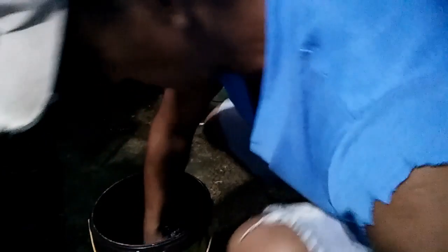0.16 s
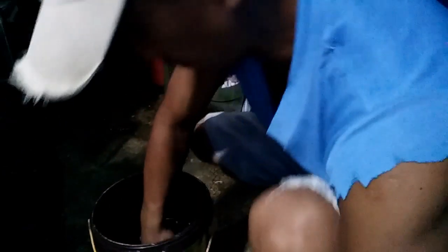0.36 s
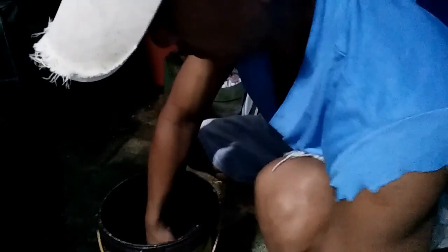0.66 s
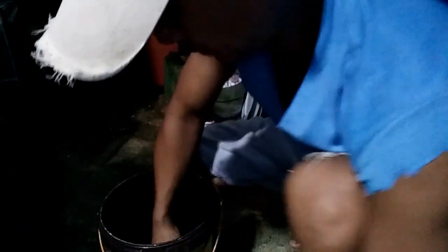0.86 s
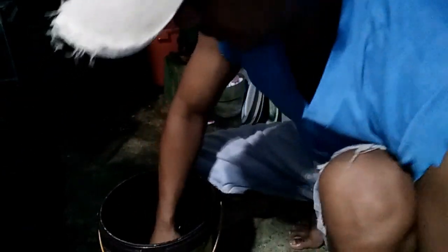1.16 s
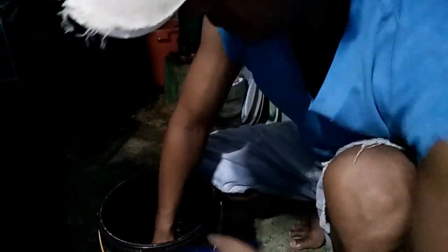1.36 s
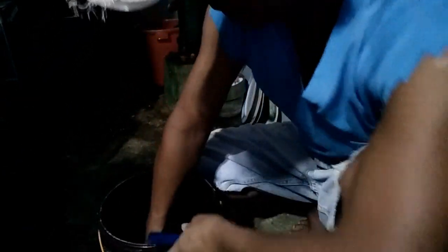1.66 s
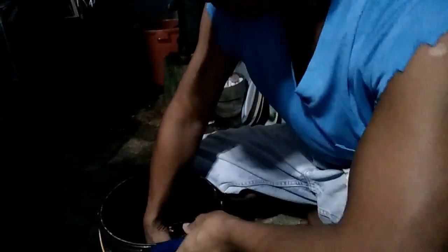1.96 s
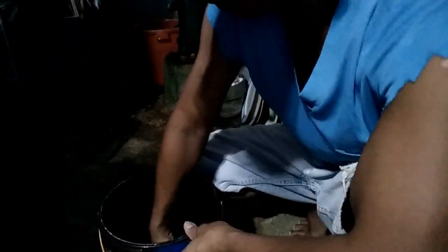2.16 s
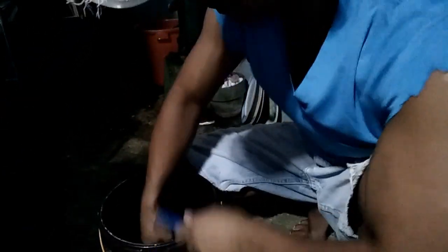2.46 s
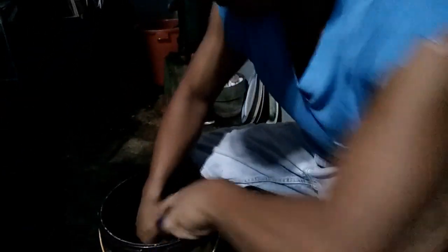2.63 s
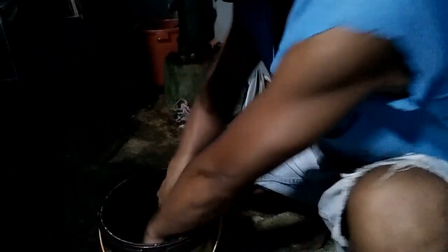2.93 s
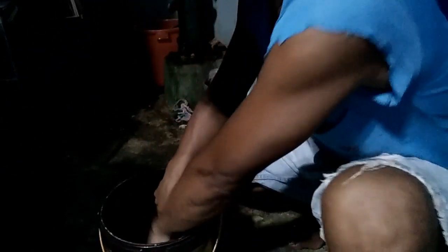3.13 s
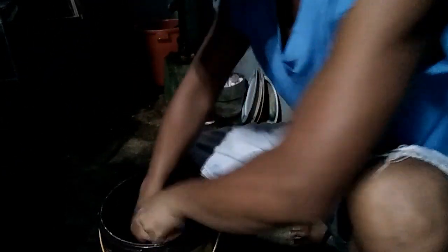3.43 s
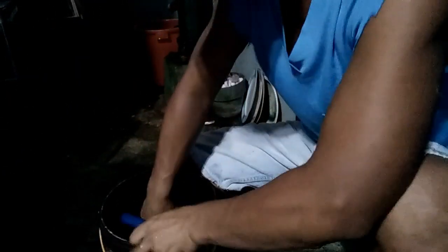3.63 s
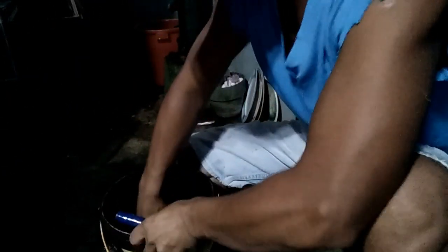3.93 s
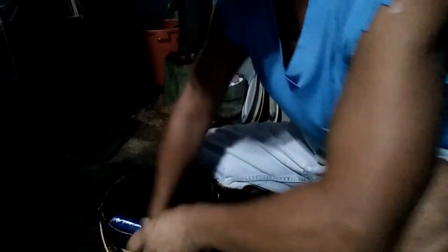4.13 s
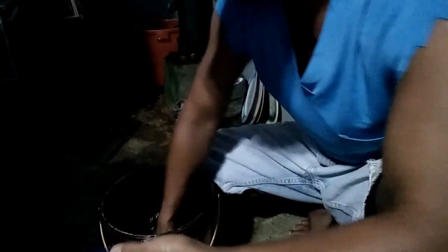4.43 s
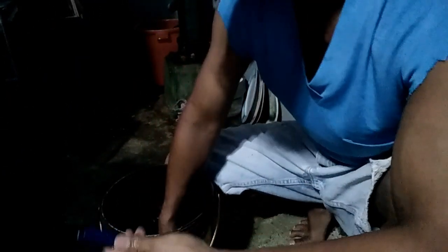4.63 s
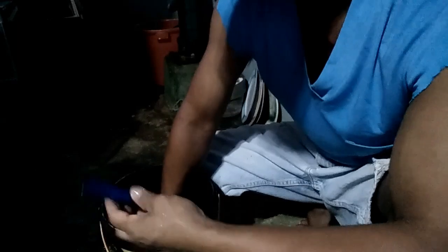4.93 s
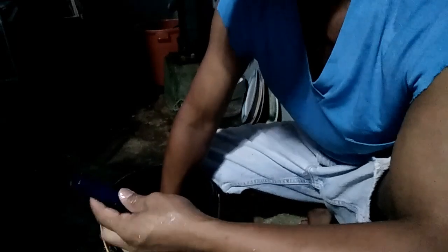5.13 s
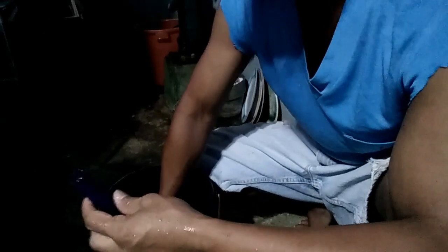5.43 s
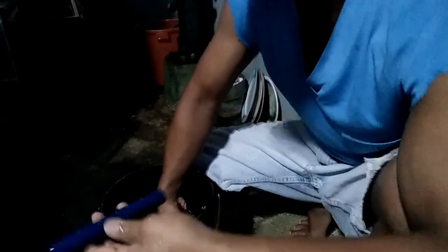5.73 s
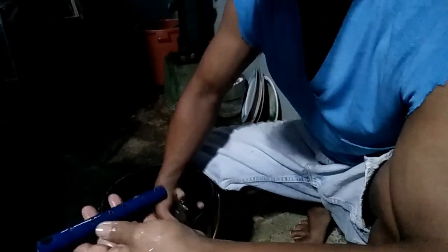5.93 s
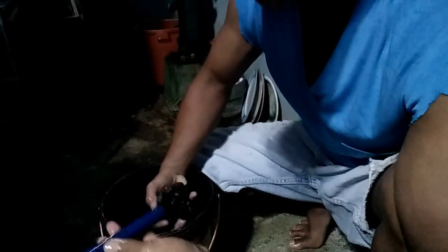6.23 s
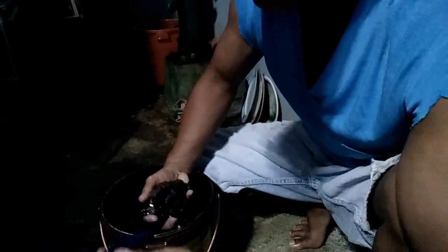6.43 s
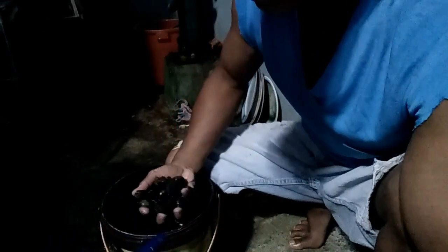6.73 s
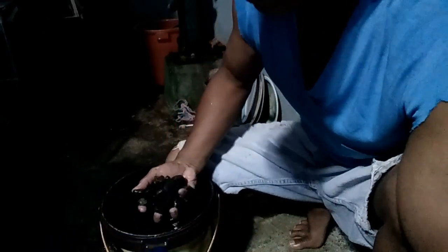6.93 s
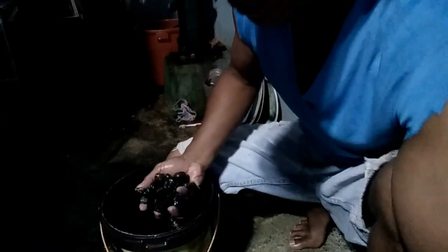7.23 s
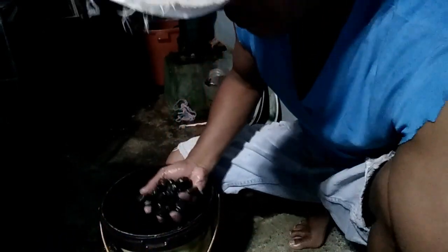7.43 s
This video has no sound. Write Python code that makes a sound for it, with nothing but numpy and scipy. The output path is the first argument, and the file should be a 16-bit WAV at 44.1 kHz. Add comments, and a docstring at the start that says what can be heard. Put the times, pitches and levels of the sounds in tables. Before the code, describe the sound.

Wet rattling strokes stir hard pieces in a water-filled bucket, with drips and bubbles, a handful slapping back, and one hard knock with a thin ring.

```python
"""Stirring hard pieces in a bucket of water

A hand stirs small hard pieces round in a plastic bucket of water, in a walled yard at night.
Each stroke sets random contacts churning on the bucket's resonances, among gurgling bubbles and splashes.
Pieces click as short noise bursts; drops, drips and an air pocket ring as bubbles of rising pitch.
Near the end a handful falls back with a slap, a knock on the rim and a thin ring follow, and a drop falls.
Diffuse echo surrounds it all, over filtered-noise night air."""
import sys
import numpy as np
from scipy import signal
from scipy.fft import rfft, irfft
from scipy.io import wavfile
from scipy.ndimage import uniform_filter1d

SR = 44100
rng = np.random.default_rng(int(sys.argv[2]) if len(sys.argv) > 2 else 0)


def unload_audio(sound):
    """Save the sound as a 16-bit wav file, at the path given as the first command line argument."""
    columns = np.transpose(np.atleast_2d(sound))
    # keep every value between -1 and 1, then stretch to whole-number steps
    steps = np.round(np.clip(columns, -1, 1) * 32767)
    wavfile.write(sys.argv[1], SR, steps.astype(np.int16))


N = 334719
TIME = np.arange(N) / SR

# Water running off the lifted hand. Each row: start in seconds, length in seconds, splash level in dB
# (before the splash's own trim).
RUNOFF = [(1.253, 0.17, -40), (2.696, 0.19, -44), (3.366, .17, -54.5), (3.601, 0.14, -55),
          (6.036, 0.18, -46.5), (6.274, 0.17, -37.5), (6.487, 0.051, -55), (6.776, 0.2, -50)]
# Spectrum of a bright tick. Each row: frequency in Hz, relative level in dB per Hz.
TICK_SPECTRUM = [(2000, -15), (4000, -6.5), (6000, -2.5), (7300, 3), (9500, 11), (11500, 0.5),
                 (14500, -7.5)]
# Spectrum of a dull clack. Each row: frequency in Hz, relative level in dB per Hz.
CLACK_SPECTRUM = [(200, -20.5), (450, -15), (600, -17), (1000, 2.5), (1600, -0.5), (2200, -1.5), (3200, -5),
                  (5000, -19), (8000, -32.5)]


def from_db(db):
    """Amplitude ratio of a level: twenty decibels per factor of ten."""
    return 10 ** (np.asarray(db) / 20)


def to_db(power):
    """Level of a power: ten decibels per factor of ten."""
    return 10 * np.log10(power + 1e-12)


def rms_one(x):
    """Normalise by the root of the mean power."""
    return x / np.sqrt(np.mean(x ** 2) + 1e-20)


def peak_one(x):
    """Normalise by the greatest excursion."""
    return x / np.max(np.abs(x))


def steady(x, size=4000):
    """Divide by the running rms over about a tenth of a second, leaving the quick grain."""
    return x / np.sqrt(np.abs(uniform_filter1d(x * x, size)) + 1e-12)


def fade(t, t60):
    """Exponential decay: the amplitude falls by 60 dB in t60 seconds."""
    return np.exp(-np.log(1000) * t / t60)


def add(out, s, sound):
    """Superposition: mix a sound in, starting at s seconds."""
    i = max(round(s * SR), 0)
    out[i:i + len(sound)] += sound[:N - i]


def at_hz(points, hz):
    """Interpolate a spectrum in dB along a logarithmic frequency axis."""
    freqs, levels = np.transpose(points)
    return np.interp(np.log(hz + 1), np.log(freqs), levels)


def colour(x, spectrum):
    """Minimum-phase filtering with unit-energy response: folding the cepstrum makes it causal."""
    size = 2048
    hz = np.arange(size // 2 + 1) * SR / size + 1
    gain = from_db(at_hz(spectrum, hz))
    # both ends of the spectrum fall away
    gain = gain / (1 + (spectrum[0][0] / hz / 2) ** 2) / (1 + (hz / spectrum[-1][0] / 2) ** 2)
    cepstrum = irfft(np.log(gain + 1e-6))
    cepstrum[1:size // 2] *= 2
    cepstrum[size // 2 + 1:] = 0
    response = irfft(np.exp(rfft(cepstrum)))
    return signal.oaconvolve(x, response / np.linalg.norm(response))[:len(x)]


def resonate(x, modes):
    """Modal synthesis: parallel two-pole resonances (Hz, width in Hz, dB) with alternating signs."""
    out = 0
    for k, (hz, width, db) in enumerate(modes):
        r = np.exp(-np.pi * width / SR)
        poles = [1, -2 * r * np.cos(2 * np.pi * hz / SR), r * r]
        mode = (1 - r * r) / 2 * signal.lfilter([1, 0, -1], poles, x + 1e-18)
        out = out + (-1) ** k * from_db(db) * mode
    return out


def drift(rate):
    """Slow random modulation of unit rms: noise through a double pole, computed every 40 samples."""
    step = 40
    r = np.exp(-2 * np.pi * rate * step / SR)
    noise = rng.standard_normal(N // step + 2002)
    slow = signal.lfilter([1], [1, -2 * r, r * r], noise)[2000:]  # skip the settling
    return np.interp(np.arange(N) / step, np.arange(len(slow)), rms_one(slow))


def grains(per_s, spread_db):
    """Random impacts: independent chances at a mean rate, with uneven sizes and either sign."""
    sizes = from_db(spread_db * np.minimum(rng.exponential(1, N), 4))
    return sizes * rng.choice([-1, 1], N) * (rng.random(N) < per_s / SR)


def burst(crack_t60, tail_db, tail_t60, size=6000):
    """An impact and its scatter: noise of unit energy under a quick and a slow decay."""
    t = TIME[:size]
    envelope = fade(t, crack_t60) + from_db(tail_db) * fade(t, tail_t60)
    sound = rng.standard_normal(size) * envelope
    return sound / np.linalg.norm(sound)


def bubble(hz, t60, rise, size=6000):
    """Bubble resonance: it swells within a cycle, and its pitch climbs by the share `rise` per t60."""
    t = TIME[:size]
    tone = np.sin(2 * np.pi * hz * t * (1 + rise * np.minimum(t / t60, 2) / 2))
    return tone * fade(t, t60) * (1 - np.exp(-(2 * hz * t) ** 2))


def night_air():
    """Broadband and narrowband noise: a distant hiss over a low drone from resonant filters."""
    # Hiss spectrum. Each row: frequency in Hz, relative level in dB per Hz.
    hiss_spectrum = [(60, -17), (120, -24.5), (420, -17.5), (850, -17), (2300, -19), (4000, -35.5),
                     (5800, -27.5), (7000, -18), (14000, -28)]
    # Drone resonances. Each row: frequency in Hz, width in Hz, relative level in dB.
    drone_modes = [(62.4, 13, -1.5), (175, 11, -5), (297, 26, -8.5), (624, 130, -9)]
    hiss = from_db(-68.5) * colour(rng.standard_normal(N), hiss_spectrum)
    drone = 0
    for hz, width, db in drone_modes:
        band = resonate(rng.standard_normal(N), [(hz, width, db)])
        drone = drone + resonate(band, [(hz, 4 * width, 0)])
    return hiss + from_db(-67.5) * rms_one(drone)


def swell(start, length, attack_s, fall_db_per_s, build_db=0):
    """Power envelope: linear amplitude rise, a hold that grows by build_db, then an even fall in dB."""
    t = TIME - start
    growth_db = build_db * (np.clip(t / length, 0, 1) - .5)
    fall_db = fall_db_per_s * np.clip(t - length, 0, 2)
    return (np.clip(t / attack_s, 0, 1) * from_db(growth_db - fall_db)) ** 2


def movements():
    """Shared excitation: each movement yields churn power, surfacing, push and splash in dB over churn."""
    # Strokes of the hand through the pieces. Each row: start in seconds, length in seconds,
    # churn level in dB, push on the bucket in dB (both before their layers' trims),
    # surfacing from 0 (deep under water) to 1 (in the open).
    strokes = [(-.03, 0.18, -47, -49, 0.19), (0.131, 0.25, -35, -44, .22), (0.298, 0.037, -26, -37.5, 0.33),
               (0.402, 0.17, -32, -38.5, 0.21), (0.592, 0.31, -29.5, -38, 0.23),
               (0.889, .11, -26.5, -40.5, 0.56), (1.015, 0.12, -30.5, -46.5, .53),
               (1.362, 0.037, -35, -38.5, 0.5), (1.426, 0.076, -33.5, -37.5, 0.25),
               (1.522, 0.078, -34, -49, 0.033), (1.65, .15, -39, -54.5, 0.031),
               (1.832, 0.054, -31, -42.5, 0.18), (1.99, .14, -28, -41.5, .15),
               (2.189, 0.068, -25, -34, 0.2), (2.358, 0.11, -32, -47.5, 0.44),
               (2.456, 0.071, -26, -67, 0.78), (2.576, 0.068, -33, -44.5, 0.8),
               (2.836, 0.024, -40, -55, 0.36), (3.175, 0.014, -34.5, -38, 0.59),
               (3.233, 0.017, -33, -50, 0.35), (3.89, 0.073, -53, -49, 0.15),
               (4.122, 0.02, -32, -40.5, 0.087), (4.174, 0.018, -45, -58, 0.13),
               (4.341, 0.21, -31, -38.5, 0.21), (4.589, 0.063, -25.5, -37.5, 0.34),
               (4.722, 0.085, -25.5, -35.5, 0.31), (4.884, 0.1, -32.5, -52, 0.09),
               (4.98, .13, -28.5, -41, 0.24), (5.17, 0.055, -26.5, -39.5, 0.27),
               (5.282, .22, -28.5, -45, 0.43), (5.504, 0.13, -27, -45.5, 0.69),
               (5.68, 0.07, -33, -44, 0.72), (5.784, 0.015, -35, -63, 0.63), (5.894, 0.1, -41, -51, 0.49)]
    # a stroke gathers force as it goes, then the load settles
    stroke_attack_s, stroke_build_db, settle_db_per_s = 0.02, 1.5, 126
    # splash over churn: for a deep stroke, and what is gained in the open
    deep_splash_db, open_gain_db = -21.5, 23.5
    for start, length, churn_db, push_db, surfacing in strokes:
        shape = swell(start, length, stroke_attack_s, settle_db_per_s, stroke_build_db)
        power = from_db(churn_db) ** 2 * shape
        yield power, surfacing, push_db - churn_db, deep_splash_db + open_gain_db * surfacing

    # falling water stirs the load a little: churn and push relative to its splash
    runoff_churn_db, runoff_push_db, runoff_surfacing = -10.5, -16, 0.22
    for start, length, splash_db in RUNOFF:
        shape = swell(start, length, attack_s=0.011, fall_db_per_s=126.5)
        power = from_db(splash_db + runoff_churn_db) ** 2 * shape
        yield power, runoff_surfacing, runoff_push_db - runoff_churn_db, -runoff_churn_db


def agitation():
    """Incoherent addition: powers sum to churn, push and splash in dB; surfacing is weighted by churn."""
    churned, pushed, splashed, surfaced = np.zeros((4, N))
    for power, surfacing, push_db, splash_db in movements():
        churned += power
        pushed += power * from_db(push_db) ** 2
        splashed += power * from_db(splash_db) ** 2
        surfaced += power * surfacing
    surfacing = np.clip(surfaced / (churned + 1e-20), 0, 1)
    return to_db(churned), to_db(pushed), to_db(splashed), surfacing


def churn(level_db, surfacing):
    """Impacts on a resonant wall: deep pieces sound muffled and ring it; shallow ones rattle openly."""
    # Resonances of the wall under water. Each row: frequency in Hz, width in Hz, relative level in dB.
    wall_modes = [(750, 45, -11.5), (917.4, 36, 4), (1080, 220, -5.5), (1490, 120, -4), (1606, 41, 0)]
    # Spectrum of the muffled contacts. Each row: frequency in Hz, relative level in dB per Hz.
    muffled_spectrum = [(500, -27.5), (750, -5.5), (1000, 6), (1300, -1.5), (2100, 4), (2700, -6.5),
                        (4000, -21.5), (6000, -29)]
    # Spectrum of the open rattle. Each row: frequency in Hz, relative level in dB per Hz.
    rattle_spectrum = [(700, -23), (1100, 5.5), (1700, 6), (3100, 2.5), (4200, 0.5), (5500, -2.5),
                       (8000, -29)]
    clumps = from_db(3.34 * drift(26))
    wall = resonate(grains(500, spread_db=0.5) * clumps, wall_modes)
    wall = signal.sosfilt(signal.butter(2, [700, 2400], "band", fs=SR, output="sos"), wall)
    muffled = colour(grains(1100, spread_db=3.5) * clumps, muffled_spectrum)
    rattle = colour(grains(1100, spread_db=3.0) * clumps, rattle_spectrum)
    deep = 1 - surfacing
    load = 1.4 * deep ** 2 * rms_one(wall)
    load = load + np.sqrt(deep) * rms_one(muffled) + surfacing * rms_one(rattle)
    return from_db(level_db - 1.0) * steady(load)


def gurgle(level_db, count=2200):
    """Entrained air: many small bubbles at random times, each ringing some tens of cycles."""
    out = np.zeros(N)
    for when, pitch, weakness, life in rng.random((count, 4)):
        hz = 840 * 4.1 ** pitch
        t60 = (28 + 45 * life) / hz
        ring = bubble(hz, t60, rise=.08, size=3000)
        add(out, when * N / SR, from_db(-18 * weakness - 5 * pitch) * ring)
    out = signal.sosfilt(signal.butter(2, 750, "high", fs=SR, output="sos"), out)
    return from_db(level_db - 6) * steady(out)


def bucket(level_db):
    """Low modes under random impacts: the load drums on the bottom and the air above the water."""
    # Low resonances of the bucket. Each row: frequency in Hz, width in Hz, relative level in dB.
    low_modes = [(84, 52, -22), (173, 16, -12), (296.8, 37, -6), (411.1, 17.5, 1), (445.4, 20.4, 3),
                 (615.4, 21, -6)]
    drumming = resonate(grains(700, spread_db=3.0), low_modes)
    drumming = signal.sosfilt(signal.butter(2, [60, 680], "band", fs=SR, output="sos"), drumming)
    return from_db(level_db - 3.0) * steady(drumming)


def splash(level_db):
    """Droplet impacts and bubble resonance: spray and fizz both come thicker as the splash grows."""
    # Spectrum of the spray and fizz. Each row: frequency in Hz, relative level in dB per Hz.
    spray_spectrum = [(1500, -5), (3000, -2.5), (5000, -5), (6300, 0.5), (7200, 4.5), (9500, 5),
                      (11000, -5), (14000, -18)]
    per_s = 1500 * from_db(.5 * (level_db + 39.5))
    spray = colour(grains(2 * per_s, spread_db=3.5), spray_spectrum)
    # each bubble birth is dealt to one of 24 pitches
    births, dealt = grains(per_s / 2, spread_db=4.0), rng.integers(0, 24, N)
    fizz = 0
    for k, hz in enumerate(np.geomspace(2500, 12000, 24)):
        mode = (hz, hz / 24, at_hz(spray_spectrum, hz))
        fizz = fizz + resonate(births * (dealt == k), [mode])
    return from_db(level_db - 4.0) * steady(rms_one(spray) + from_db(-4.5) * rms_one(fizz))


def drops():
    """Bubble resonance: drops and pinched-off air each leave one ringing bubble."""
    # Drops and single bubbles. Each row: start in seconds, initial pitch in Hz, level in dB, t60 in seconds.
    single_bubbles = [(.227, 1100, -17.5, 0.043), (.552, 950, -19.5, 0.073), (1.317, 1490, -23, 0.032),
                      (1.356, 706, -32.5, 0.083), (1.377, 2990, -25.5, 0.042), (2.711, 900, -21, 0.043),
                      (2.852, 298, -39.5, 0.16), (2.898, 1950, -33, 0.014), (3.316, 2570, -26, 0.031),
                      (3.365, 844, -39, .1), (3.657, 1100, -41, 0.038), (3.658, 2850, -44.5, .05),
                      (3.764, 2790, -46, 0.037), (4.06, 970, -37.5, 0.057), (6.197, 2020, -29, 0.033),
                      (6.428, 1593, -20, 0.1), (6.76, 2950, -31.5, 0.06), (7.253, 1277, -40, 0.11)]
    out = np.zeros(N)
    for s, hz, db, t60 in single_bubbles:
        add(out, s, from_db(db) * bubble(hz, t60, rise=0.031))
    return out


def clicks():
    """Impact resonance: each contact pairs a bright tick with a dull clack at a pitch of its own."""
    # Clicks of pieces, loud and faint, and the tick of a falling drop. Each row: start in seconds,
    # bright tick peak in dB, dull clack peak in dB, clack pitch in Hz.
    contact_clicks = [(0.6214, -43, -17, 2120), (0.7235, -26, -14.5, 1970), (0.8929, -20, -22, 966),
                      (0.9272, -22, -32, 955), (0.9781, -15, -18.5, 888), (1.0885, -14, -33, 907),
                      (1.1713, -20, -42, 1780), (1.2024, -33, -20, 1860), (1.2958, -20, -27.5, 940),
                      (1.336, -17.5, -26, 942), (1.3752, -36, -22, 3200), (1.3852, -13, -25, 1390),
                      (2.1149, -31.5, -23.5, 940), (2.394, -23.5, -26, 960), (2.5331, -17, -30, 1510),
                      (2.6476, -34, -19, 1490), (2.6769, -23, -22, 1100), (2.77, -13.5, -49, 1020),
                      (3.1879, -15.5, -12, 1500), (3.251, -22, -17, 1420), (3.267, -25, -20, 1480),
                      (3.419, -37, -38, 1680), (3.491, -37, -42, 1030), (3.5163, -35, -69, 1680),
                      (3.6059, -26.5, -42.5, 950), (3.8127, -42, -33, 1140), (3.884, -37.5, -40.5, 1020),
                      (4.154, -25.5, -23.5, 920), (4.1979, -21, -38, 937), (4.3216, -26, -59.5, 1230),
                      (4.531, -26, -37, 1200), (4.6259, -22, -11, 1560), (4.655, -39, -16, 1120),
                      (5.832, -19, -17, 930), (5.9787, -12.5, -60.5, 958), (6.0071, -19.5, -16.5, 2370),
                      (6.1958, -23, -10.5, 1720), (6.2809, -21, -21.5, 1270), (6.3112, -17.5, -32, 1770),
                      (6.331, -31.5, -19.5, 2020), (6.372, -22.5, -18.5, 2850),
                      (6.5006, -18.5, -43.5, 1490), (6.535, -40.5, -22.5, 1560), (6.567, -27, -13.5, 1460),
                      (6.603, -52, -26, 1260), (6.761, -38.5, -19, 1180), (7.0307, -29.5, -39, 3860),
                      (7.2606, -45.5, -63, 1240)]
    out = np.zeros(N)
    for s, tick_db, clack_db, hz in contact_clicks:
        tick = burst(crack_t60=.012, tail_db=-15, tail_t60=.07)
        tick = tick + resonate(tick, [(rng.uniform(6500, 8200), 1200, 2)])
        add(out, s, from_db(tick_db) * peak_one(colour(tick, TICK_SPECTRUM)))
        clack = burst(crack_t60=.013, tail_db=-14, tail_t60=.09)
        clack = clack + resonate(clack, [(hz, 240, 8), (1.62 * hz, 300, 3)])
        add(out, s, from_db(clack_db) * peak_one(colour(clack, CLACK_SPECTRUM)))
    return out


def chinks():
    """Cascaded resonance: a small hard piece rebounds with a thin, high ring."""
    # Thinly ringing pieces. Each row: start in seconds, pitch in Hz, peak in dB,
    # t60 in seconds of the scatter that drives the ring.
    thin_rings = [(1.0042, 7030, -8.5, 0.026), (6.9, 9560, -11, 0.17)]
    out = np.zeros(N)
    for s, hz, db, t60 in thin_rings:
        contact = burst(crack_t60=0.012, tail_db=-17.5, tail_t60=t60, size=14000)
        ring = resonate(contact, [(hz, 700, 0)])
        add(out, s, from_db(db) * peak_one(resonate(ring, [(hz, 1500, 0)])))
    return out


def drips(count=24):
    """Poisson arrivals: drips fall at random off the hand; each traps one small ringing bubble."""
    per_s, over_splash_db, spread_db = 37, 5.5, 3.5
    low_hz, high_hz, cycles = 1100, 5160, 65  # cycles of ringing in one t60
    out = np.zeros(N)
    for start, length, splash_db in RUNOFF:
        gaps, pitches, sizes = rng.exponential(1, count), rng.random(count), rng.standard_normal(count)
        for delay, pitch, size in zip(np.cumsum(gaps) / per_s, pitches, sizes):
            if delay < length:
                hz = low_hz * (high_hz / low_hz) ** pitch
                level_db = splash_db + over_splash_db + spread_db * size
                add(out, start + delay, from_db(level_db) * bubble(hz, cycles / hz, rise=0.074))
    return out


def gulp(s, hz, level_db):
    """Large-bubble resonance: a pocket of air rolls up past the hand and climbs steeply in pitch."""
    out = np.zeros(N)
    add(out, s, from_db(level_db) * bubble(hz, t60=0.28, rise=7.5, size=9000))
    return out


def bumps():
    """Impulse excitation of low modes: the bucket is nudged and booms briefly."""
    # Soft bumps against the bucket. Each row: start in seconds, peak in dB.
    nudges = [(3.9, -38), (4.127, -27)]
    out = np.zeros(N)
    for s, db in nudges:
        push = burst(crack_t60=.03, tail_db=-17, tail_t60=.13, size=12000)
        boom = resonate(push, [(85.0, 52, -0.5), (171, 19, 9), (248, 77, -2), (443, 28, -2.5)])
        add(out, s, from_db(db) * peak_one(boom))
    return out


def plunge(s, lasts_s, spray_db, slap_db, size=8000):
    """Dense random impacts: a clump falls back in a quick run of slaps under a sheet of spray."""
    out, t = np.zeros(N), TIME[:size]
    growth = .5 + .5 * np.minimum(t / lasts_s, 1)
    shape = fade(np.maximum(t - lasts_s, 0), t60=0.062) * growth
    spray = colour(rms_one(grains(6000, spread_db=1.0)[:size]) * shape, TICK_SPECTRUM)
    slap = colour(rms_one(grains(2700, spread_db=2.0)[:size]) * shape, CLACK_SPECTRUM)
    add(out, s, from_db(spray_db) * spray + from_db(slap_db) * slap)
    return out


def knock(s, peak_db):
    """Impact on damped modes: a hard blow chatters on the rim."""
    # Resonances of the knocked rim. Each row: frequency in Hz, width in Hz, relative level in dB.
    rim_modes = [(1020, 310, -2), (1610, 400, 0), (2150, 270, 2), (3010, 290, -3.5), (3820, 300, -5),
                 (5320, 390, -2.5), (6100, 310, -2.5), (8300, 2100, -8.5)]
    out = np.zeros(N)
    blow = burst(crack_t60=.08, tail_db=-20, tail_t60=.2, size=10000)
    add(out, s, from_db(peak_db) * peak_one(resonate(blow, rim_modes)))
    return out


def yard(x, t60, wet_db, size=30000):
    """Diffuse reverberation: nearby walls return a short tail of decaying noise."""
    # Spectrum of the yard's echo. Each row: frequency in Hz, relative level in dB.
    echo_spectrum = [(100, -9.5), (500, 2.5), (1500, -1.5), (3000, -5.5), (4200, -4), (6100, -7.5),
                     (7100, -3), (8200, 1.5), (9600, -1.5), (11000, -0.5), (14000, 2)]
    t = TIME[:size]
    onset = 1 - np.exp(-t / 0.0069)
    tail = rng.standard_normal(size) * fade(t, t60) * onset
    echo = signal.oaconvolve(x, tail / np.linalg.norm(tail))[:N]
    return x + from_db(wet_db) * colour(echo, echo_spectrum)


def scene():
    """Superposition: stirring, contacts and water share the yard's echo; the night air is added dry."""
    churn_db, push_db, splash_db, surfacing = agitation()
    stirring = churn(churn_db, surfacing) + gurgle(churn_db - 1.5)
    stirring = stirring + bucket(push_db) + splash(splash_db)
    contacts = clicks() + chinks() + bumps() + knock(6.8835, peak_db=-9)
    water = drops() + drips() + gulp(1.715, hz=107.7, level_db=-44)
    water = water + plunge(6.411, lasts_s=0.011, spray_db=-19.0, slap_db=-20.5)
    return (yard(stirring + contacts + water, t60=0.33, wet_db=-5.5) + night_air())[None]


def record(dry):
    """Elliptic low-pass filtering: the treble is cut steeply above 14500 Hz."""
    return signal.sosfilt(signal.ellip(10, .2, 80, 14500, fs=SR, output="sos"), dry)


dry = scene()
out = record(dry)
unload_audio(out)
```